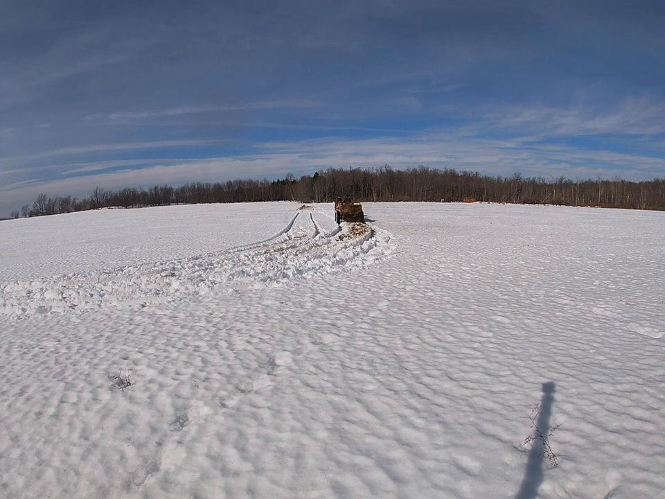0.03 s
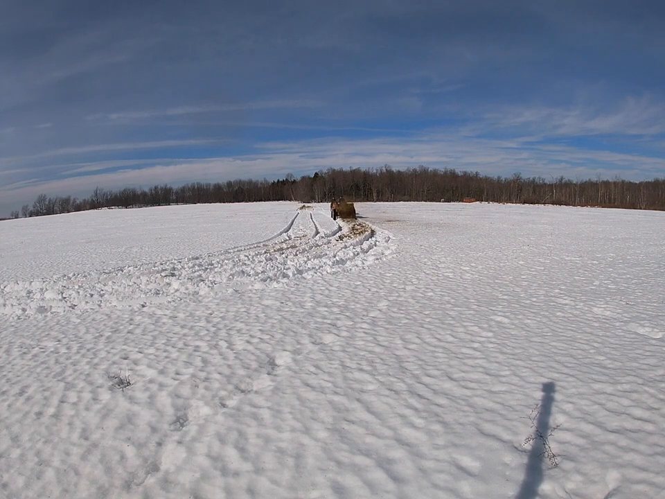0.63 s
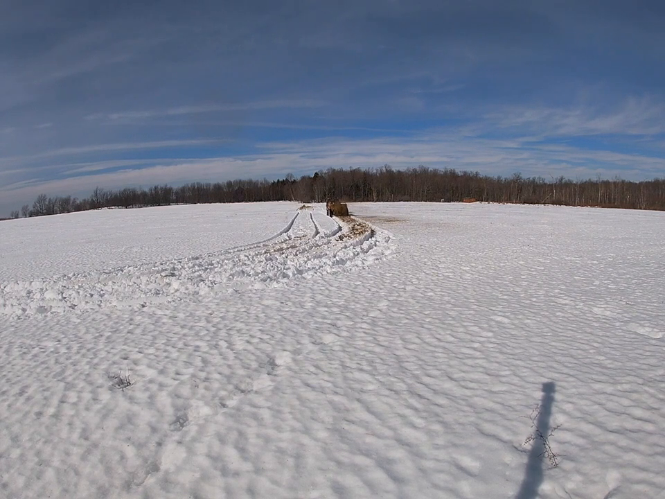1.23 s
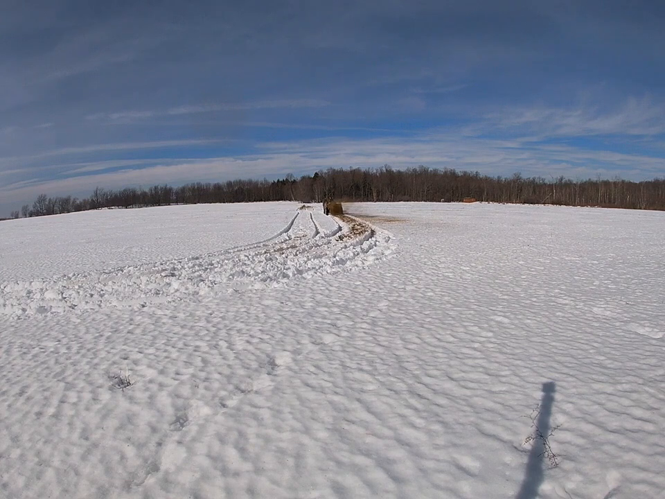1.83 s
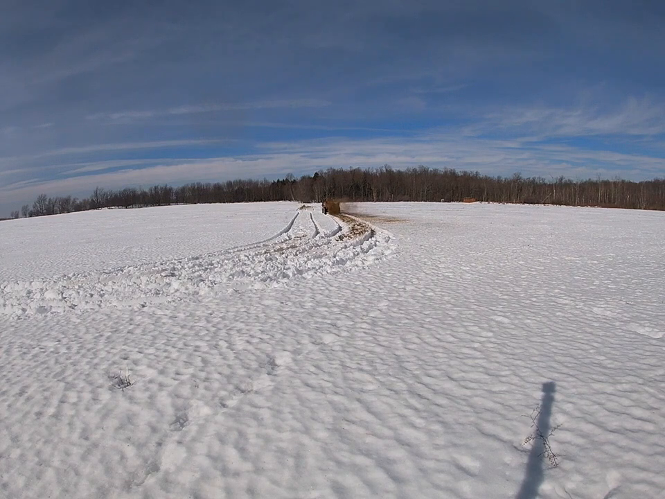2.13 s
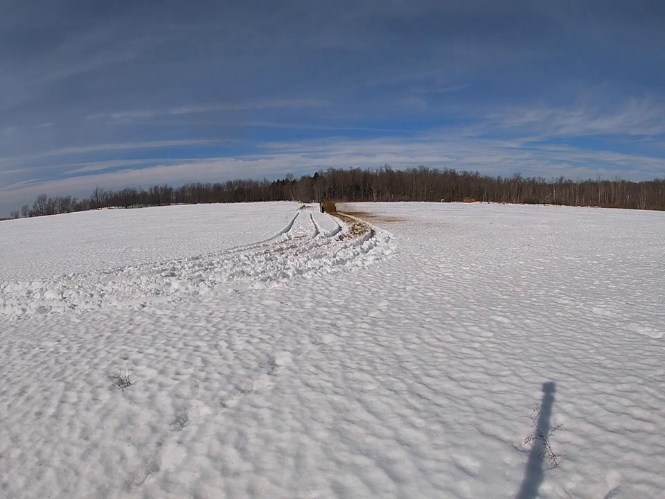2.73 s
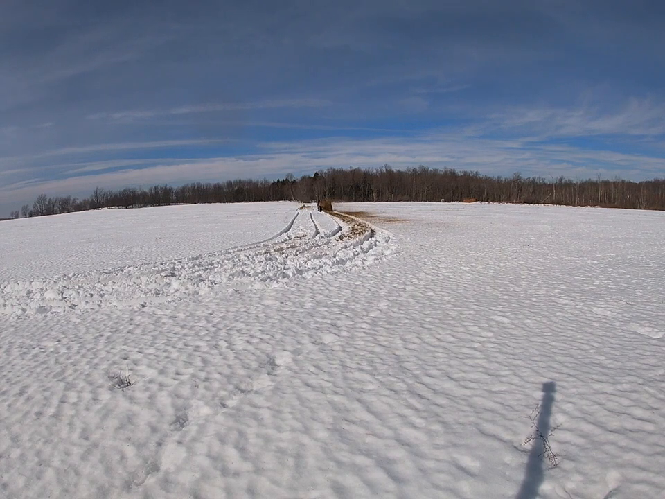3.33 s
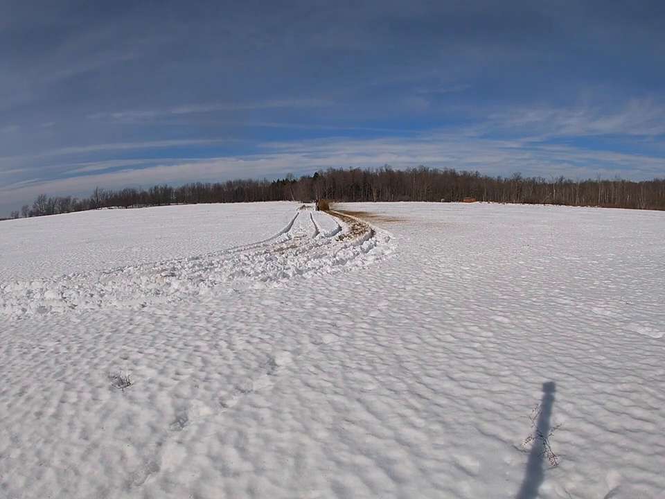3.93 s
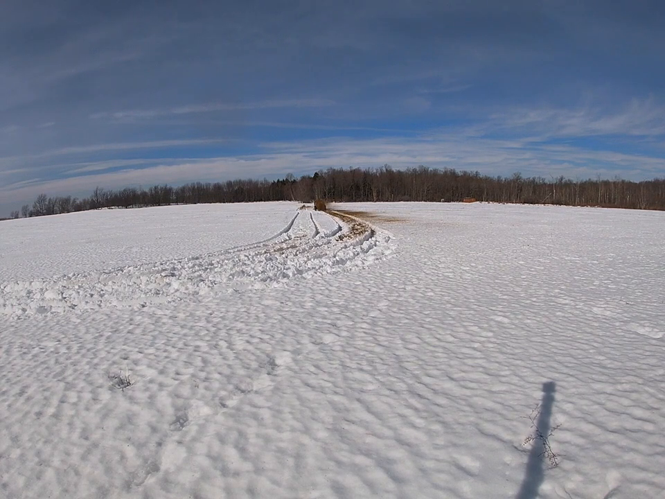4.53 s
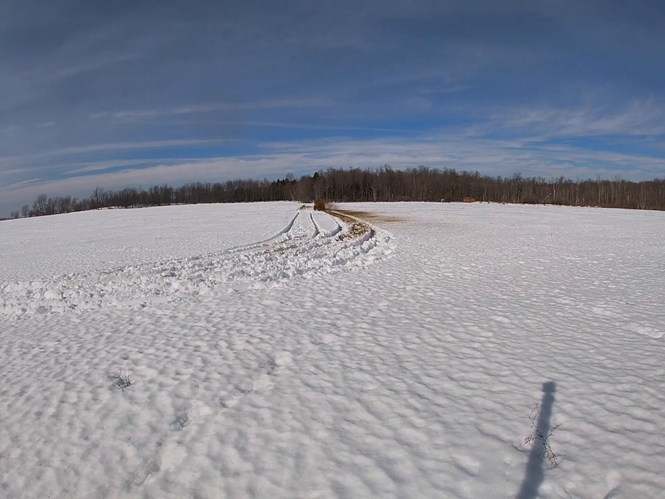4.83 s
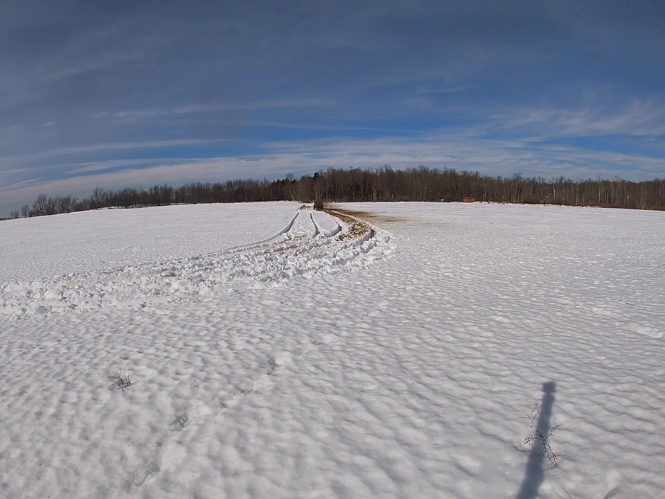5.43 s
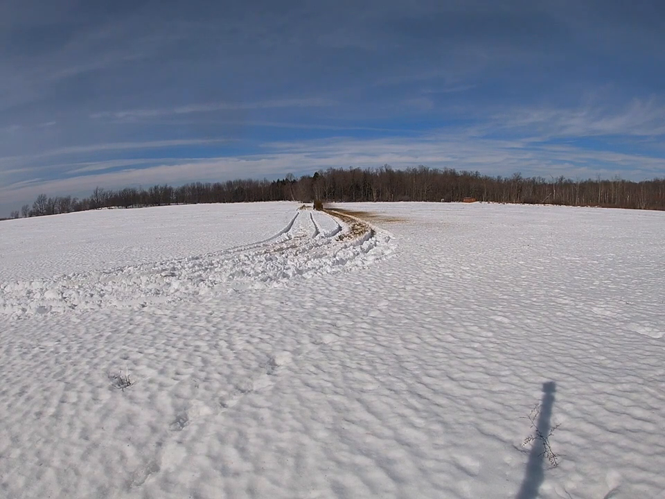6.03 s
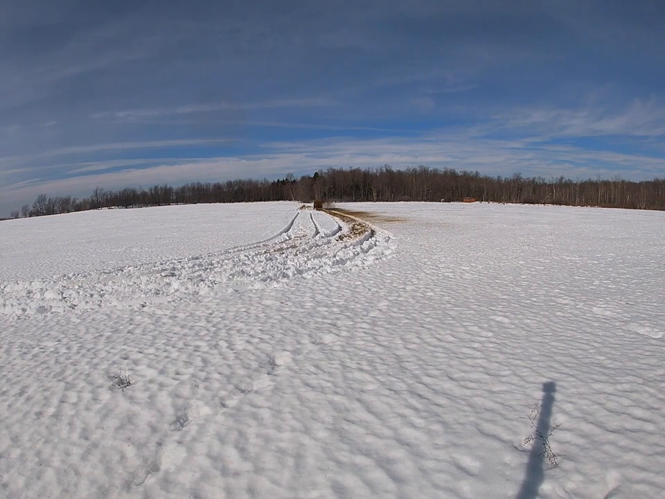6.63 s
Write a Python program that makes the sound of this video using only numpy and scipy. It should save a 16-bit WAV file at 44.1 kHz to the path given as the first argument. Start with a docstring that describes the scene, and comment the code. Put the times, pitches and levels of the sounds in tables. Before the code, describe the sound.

Wind thumps on the microphone as a farm spreader rattles, knocks and squeaks over a tractor's low rumble, gradually receding.

```python
"""A snowy field, where a tractor pulls a manure spreader away at a steady pace.
Beaters, load and apron chain collide in a dense clatter over a dull running rumble, fading with distance.
Slats knock, wads thrash through, steel links snap and jingle, the dry chain squeaks, and the box gives one
heavy clunk. A second path over the snow hollows the machine's sound; wind buffets the microphone."""
import sys
import numpy as np
from scipy import signal
from scipy.fft import rfft, irfft
from scipy.io import wavfile
from scipy.ndimage import uniform_filter1d

SR = 44100
rng = np.random.default_rng(int(sys.argv[2]) if len(sys.argv) > 2 else 0)


def transcribe(u):
    """Save the signal u as a 16-bit wav file named by the first command-line argument.

    u: samples, shape (n,) or (channels, n), limited to [-1, 1]; the rate is SR.
    q: integer samples, one column per channel.
    """
    v = np.clip(np.atleast_2d(u).T, -1, 1)
    q = np.round(v * 32767).astype(np.int16)
    wavfile.write(sys.argv[1], SR, q)


N = 295029
TIME = np.arange(N) / SR

# Tone of each machine layer, dull to bright: f/Hz, relative level/dB
RUMBLE_EQ = [(50, -39.5), (150, 6.5), (300, 1.5), (430, 0), (700, -4), (950, -5), (1400, -7), (2500, -18.5),
             (6000, -88)]
CLATTER_EQ = [(200, -40), (600, -8.5), (920, -6.5), (1070, 2.5), (1250, 0.5), (1800, 1.5), (2450, -0.5),
              (2850, -0.5), (3200, -5.5), (3900, -18), (6000, -21), (12000, -78.5)]
RATTLE_EQ = [(1500, -10), (3300, 2), (4100, 0.5), (4600, -2), (5150, 0.5), (6100, -7.5), (6850, -14.5),
             (7600, -12), (8100, -17.5), (10200, -39.5), (11500, -43.5), (15000, -46)]
JINGLE_EQ = [(4500, -54), (6400, -6), (6780, -1), (7100, -2.5), (7600, -12), (8100, -19), (10100, -27),
             (11500, -36), (15000, -65)]
SIZZLE_EQ = [(7000, -51), (9200, -8), (10300, 1.5), (11500, -16), (15000, -40)]
# Fader rides: t/s, relative level/dB
RUMBLE_RIDE = [(0, -4), (.35, -2.5), (.52, -17), (.9, 2), (1.22, -4), (1.6, 1), (2.2, 0), (2.76, 5),
               (2.95, -2.5), (3.1, 3.5), (3.26, 0.5), (3.5, 1.5), (3.6, 5.5), (3.84, 7.5), (4.0, -12),
               (4.26, -2), (4.45, -5), (5.3, -6), (6.0, -9.5), (6.69, 0)]  # swells and sinks as the tractor drives on
EFFORT_RIDE = [(0, 0), (.3, 0), (.8, 1), (1.1, 0.5), (1.18, -2.5), (1.28, 0), (1.46, 0), (1.56, 2.5),
               (1.6, -2.5), (1.88, 3), (1.95, -0.5), (2.1, 1), (2.2, -3.5), (2.33, 1.5), (2.45, 0),
               (3.1, -0.5), (3.22, 0), (3.28, -2), (3.42, -2.5), (3.7, -2.5), (3.9, -1), (4.3, -2),
               (4.78, 2.5), (5.4, 1), (5.85, 1.5), (5.91, -2.5), (5.98, 0), (6.04, -2), (6.15, -1.5),
               (6.25, -2.5), (6.69, 0)]  # how hard beaters and chain shake
JINGLE_RIDE = [(0, -54), (.08, -53.5), (.12, -58.5), (.48, -54), (.6, -63), (1.0, -57.5), (1.2, -64),
               (1.255, -55), (1.34, -62.5), (1.52, -59), (1.6, -67), (1.68, -60.5), (2.08, -65.5),
               (2.16, -70), (2.27, -83), (2.34, -63.5), (2.8, -71), (2.99, -64), (3.28, -65), (3.36, -73),
               (3.44, -65.5), (3.62, -66.5), (3.72, -65), (3.93, -67), (4.16, -68), (4.24, -84),
               (4.35, -67.5), (4.9, -73), (5.03, -77), (5.07, -61.5), (5.14, -74), (5.205, -60.5),
               (5.28, -75), (5.41, -65), (5.57, -87), (5.62, -62), (5.69, -81), (5.82, -61), (5.92, -72),
               (6.17, -69.5), (6.69, -76)]  # steel links ringing in bunches

def running_gear(rumble_db=-44, clatter_db=-43, rattle_db=-50, jingle_db=-1, sizzle_db=-77):
    """Tractor rumble and dense collisions of beaters, load and chain shake together as they recede."""
    near, effort = nearness(), curve(EFFORT_RIDE)
    shake = amp(1.33 * drift(21))
    rumble = steadied(colour(impacts(per_s=1300, spread_db=2.5, t60=0.02), RUMBLE_EQ), 0.067)
    clatter = steadied(colour(impacts(per_s=690, spread_db=3.5, t60=0.11), CLATTER_EQ), 0.024)
    rattle = steadied(colour(impacts(per_s=1100, spread_db=3, t60=0.049), RATTLE_EQ), 0.1)
    jingle = steadied(colour(impacts(per_s=260, spread_db=5.5, t60=0.078), JINGLE_EQ), 0.11)
    sizzle = colour(impacts(per_s=500, spread_db=2, t60=0.04), SIZZLE_EQ)
    rumble *= amp(rumble_db) * near * curve(RUMBLE_RIDE)
    clatter *= amp(clatter_db) * near * effort
    rattle *= amp(rattle_db) * near ** 1.29 * effort  # treble fades faster than 1 / distance
    jingle *= amp(jingle_db) * curve(JINGLE_RIDE)
    sizzle *= amp(sizzle_db - 5.5 * TIME)  # the air swallows the top end as the machine leaves
    return shake * chain_catch() * (rumble + clatter + rattle + sizzle) + jingle


# Slat and beater hits: t/s, relative level/dB, treble lift/dB
KNOCK_CUES = [(0.0263, -27.5, 5.5), (0.071, -36, 6), (.139, -33, 6), (.297, -37, 4), (.353, -33.5, 9),
              (0.4036, -33, 2), (0.4592, -31.5, 9), (0.495, -35, 9), (0.5562, -31, 5), (0.613, -36.5, 8),
              (0.6462, -31.5, 5.5), (.721, -31.5, 1), (0.758, -30.5, 6), (.798, -33, 3), (.849, -28, 4),
              (.858, -29.5, 1), (0.925, -32.5, 2), (0.9449, -30, 0), (1.04, -32, -1), (1.144, -30, 3),
              (1.189, -31.5, -2), (1.252, -27.5, 4.5), (1.3491, -27.5, 0), (1.495, -31.5, 3),
              (1.639, -29.5, -3), (1.67, -29.5, -0.5), (1.7775, -34, -3), (1.887, -35.5, -2),
              (1.971, -37, 1), (2.108, -31.5, 3), (2.224, -36.5, -4), (2.2735, -32.5, -11), (2.356, -37, 1),
              (2.427, -34.5, -3), (2.563, -31.5, -5), (2.639, -33.5, -5), (3.023, -33.5, 0.5),
              (3.102, -35.5, 2), (3.132, -35.5, 3), (3.245, -34, -1), (3.2956, -40, 1), (3.573, -36, 4),
              (3.66, -39, -1), (3.794, -39, -6), (3.871, -40, -11), (3.9603, -36, -1), (4.035, -45, 6),
              (4.093, -35, -12), (4.641, -43, 6), (4.7455, -34, -3), (4.802, -39.5, -1), (4.906, -38, 1),
              (5.111, -35, -4), (5.156, -38, 4), (5.2, -35.5, 2), (5.326, -39, 6), (5.4306, -34.5, -2),
              (5.504, -39, 5), (5.5513, -32.5, 2), (5.598, -37, -16), (5.6223, -50, 7), (5.67, -39.5, -2),
              (5.777, -38.5, 4), (5.935, -39, 3), (6.121, -34.5, 2.5), (6.239, -43, 10), (6.393, -45, 1),
              (6.458, -35, 1.5), (6.5645, -35.5, -4)]
# Tone of the struck steel frame: f/Hz, relative level/dB
KNOCK_EQ = [(200, -41), (450, 2.5), (850, -3), (1100, 3.5), (1800, 4.5), (2850, 4.5), (3600, -6.5),
            (5200, -11), (6200, -15.5), (6900, -15.5), (8200, -29), (10300, -46.5), (12000, -58.5),
            (15000, -65)]

def knocks(level_db=-2, grain_db=1.5, crack_db=5, crack_s=0.0018, hold_s=0.0051, t60=0.053, size=6000):
    """Each knock is a sharp crack, then a brief chatter of contacts that dies away in the steel frame."""
    out, t = np.zeros(N), np.arange(size) / SR
    envelope = amp(-60 * np.maximum(t - hold_s, 0) / t60)
    envelope *= amp(crack_db * np.exp(-t / crack_s))
    for s, db, treble_db in KNOCK_CUES:
        contacts = rng.standard_normal(size)
        contacts *= amp(grain_db * unit(uniform_filter1d(rng.standard_normal(size), 60)))
        eq = [(hz, level + treble_db * (hz > 3300)) for hz, level in KNOCK_EQ]
        knock = colour(contacts * envelope, eq, size=1024)
        attack_height = 2 * np.sqrt(np.mean(knock[:size // 24] ** 2))
        add(out, s, amp(db + level_db) * knock / attack_height)
    return out


def chain_catch(duck_db=1.5, lead_s=0.022, release_s=0.003):
    """Gain that ducks the clatter as the chain catches and recovers as it lets go with a knock."""
    caught = sum(np.interp(TIME, [s - lead_s, s, s + release_s], [0, 1, 0]) for s, _, _ in KNOCK_CUES)
    return amp(-duck_db * np.sin(np.pi / 2 * np.minimum(caught, 1)))


def small_knocks(level_db=-53, per_s=20, t60=0.046, spread_db=10, size=4000):
    """Lighter blows of clods and links fall at random among the big ones."""
    blows = np.zeros(N)
    for slot, (late, strength) in enumerate(rng.random((int(per_s * N / SR), 2))):
        add(blows, (slot + late) / per_s, amp(spread_db * strength) * burst(t60, size))
    return amp(level_db) * nearness() * curve(EFFORT_RIDE) * unit(colour(blows, KNOCK_EQ, size=1024))


# Wads of the load hitting the beaters: t/s, length/s, level/dB
WAD_CUES = [(0.378, 0.067, -39.5), (2.088, 0.11, -44), (2.277, 0.062, -43.5), (2.325, 0.18, -43.5),
            (2.784, 0.064, -42), (2.874, 0.05, -43.5), (3.013, 0.044, -45), (3.1, 0.038, -42),
            (3.523, 0.095, -48), (3.655, 0.057, -46), (3.781, 0.053, -43), (3.864, 0.03, -48),
            (4.091, 0.072, -49.5), (6.23, 0.041, -54), (6.668, 0.083, -44)]
# Their thick midrange: f/Hz, relative level/dB
WAD_EQ = [(150, -6.5), (380, 3), (850, 1), (1200, 3.5), (2000, -0.5), (2900, -1), (3700, -23), (6000, -30),
          (12000, -68)]

def wads(lumpy_db=3):
    """Each wad thrashes through the beaters: a fast attack, an uneven churn and a short tail."""
    envelope = np.zeros(N)
    for s, length, db in WAD_CUES:
        progress = np.linspace(0, 1, int(length * SR))
        add(envelope, s, amp(db) * np.interp(progress, [0, .1, .7, 1], [0, 1, .9, 0]))
    churn = rng.standard_normal(N) * amp(lumpy_db * drift(90))
    return envelope * unit(colour(churn, WAD_EQ))


# Steel snapping against steel: t/s, peak level/dB
CLICK_CUES = [(.142, -22.5), (.356, -38), (.461, -28), (0.559, -26), (1.255, -42), (1.637, -34),
              (1.673, -37), (2.993, -36), (3.793, -40), (4.097, -42), (4.6418, -32), (5.556, -39),
              (5.602, -37), (5.6235, -33), (5.64, -33), (6.123, -52)]
# Its hard, bright tone: f/Hz, relative level/dB
CLICK_EQ = [(400, -40), (1200, 4), (2850, 17.5), (3700, 2), (5200, 0.5), (6100, -21), (6900, 5.5),
            (8200, -26), (10300, -19.5), (14000, -57)]

def steel_clicks(t60=0.007, size=3000):
    """Hard steel contacts give bright snaps only a few milliseconds long."""
    out = np.zeros(N)
    for s, db in CLICK_CUES:
        snap = colour(burst(t60, size), CLICK_EQ, size=1024)
        add(out, s, amp(db) * snap / abs(snap).max())
    return out


# The dry chain on its sprocket: t/s, length/s, f/Hz, relative level/dB
SQUEAK_CUES = [(0.1, 0.021, 2810, -34), (0.383, 0.025, 2710, -38), (0.605, 0.02, 2800, -36.5),
               (0.639, 0.023, 2874, -31.5), (0.844, 0.019, 3000, -33.5), (1.105, 0.04, 2810, -38),
               (2.986, 0.033, 2780, -43), (5.06, 0.053, 2815, -42.5), (5.156, 0.039, 2835, -39.5),
               (5.207, 0.028, 2830, -40.5), (5.503, 0.069, 2830, -46), (5.769, 0.026, 2730, -43),
               (6.175, 0.036, 2800, -47.5)]

def chain_squeaks(level_db=-10, rough_db=4, rise=0.015, waver=0.016):
    """A link sticks and slips as it turns: a rough, wavering squeak that rises as the chain tightens."""
    out, bend, grip = np.zeros(N), drift(220), drift(290)
    for s, length, hz, db in SQUEAK_CUES:
        span = slice(int(s * SR), int((s + length) * SR))
        glide = rise * np.linspace(-.5, .5, len(bend[span]))
        cycles = np.cumsum(hz * (1 + glide + waver * bend[span])) / SR
        squeak = np.sin(2 * np.pi * cycles) * amp(rough_db * grip[span])
        squeak *= signal.windows.tukey(len(squeak), .5)
        add(out, s, amp(db + level_db) * unit(squeak))
    return out


# Something heavy hits the box and bounces: t/s, relative level/dB
CLUNK_CUES = [(4.6803, -33), (4.684, -33.5)]
# Resonances of the box: f/Hz, relative level/dB, t60/s
BOX_MODES = [(503, -9.5, 0.066), (930, -4, 0.036), (1080, -5, 0.036), (1350, -0.5, 0.016),
             (1650, -3, 0.024), (1820, 1.5, 0.031), (2050, -4, 0.013), (2400, -8, 0.02), (2800, -8, 0.025)]

def box_clunk(crack_db=1, crack_t60=0.011, lowpass_hz=3300):
    """A heavy blow draws a crack and a hollow ring from the spreader box."""
    out = np.zeros(N)
    for s, db in CLUNK_CUES:
        add(out, s, amp(db) * ring(BOX_MODES))
        add(out, s, amp(db + crack_db) * burst(crack_t60, size=4000))
    return signal.sosfilt(signal.butter(4, lowpass_hz, fs=SR, output="sos"), out)


# The path that skims the snow: t/s, gain/ratio to the direct sound, delay/s
SNOW_PATH = [(0, 0.034, 0.00023), (2.5, 0.018, 0.00091), (4.1, 0.16, 0.00042), (5.6, 0.21, 0.00043),
             (6.0, 0.12, 0.000585), (6.69, 0.24, 0.00055)]

def over_snow(direct):
    """The sound arrives twice, a moment apart, which carves a shifting comb into its spectrum."""
    times, *columns = np.transpose(SNOW_PATH)
    gain, delay = (np.interp(TIME, times, column) for column in columns)
    reflection = gain * np.interp(TIME - delay, TIME, direct)
    return (direct + reflection) / np.sqrt(1 + gain ** 2)


# The wind bed dies down, then picks up: t/s, level/dB
BREEZE_RIDE = [(0, -28.5), (.25, -33.5), (.32, -28), (.44, -30.5), (.55, -31), (.615, -35.5), (.74, -29.5),
               (.83, -37), (.92, -32), (1.1, -32), (1.38, -32), (1.48, -31), (1.6, -31.5), (1.7, -32),
               (1.82, -30), (2.01, -34.5), (2.13, -30), (2.22, -37.5), (2.35, -31.5), (2.55, -34),
               (2.85, -31.5), (3.1, -35), (3.36, -36.5), (3.46, -39), (3.62, -39.5), (3.69, -36),
               (3.75, -41.5), (3.86, -33.5), (3.97, -34.5), (4.06, -39), (4.26, -36), (4.35, -37.5),
               (4.55, -41.5), (4.7, -41.5), (4.85, -44), (4.98, -47.5), (5.04, -39.5), (5.09, -47),
               (5.15, -39), (5.22, -44), (5.3, -50.5), (5.48, -41), (5.73, -42), (5.81, -63), (5.86, -43),
               (5.97, -45), (6.08, -33), (6.19, -28.5), (6.28, -31.5), (6.35, -39.5), (6.48, -34),
               (6.62, -41.5), (6.69, -23.5)]
# Gusts on top of it: crest t/s, length/s, level/dB
GUST_CUES = [(.37, 0.1, -25.5), (1.47, 0.12, -28.5), (1.92, 0.054, -26.5), (2.09, 0.11, -28),
             (2.765, 0.057, -24.5), (4.27, 0.079, -32), (5.22, 0.077, -37), (5.71, .08, -45)]
# Deep push of large eddies and flutter of small ones: f/Hz, relative level/dB
PUSH_EQ = [(8, -4.5), (22, -3), (45, 0), (70, -2.5), (100, -5), (130, -23), (300, -44), (900, -97.5),
           (4000, -120)]
FLUTTER_EQ = [(40, -21), (90, -5), (120, -0.5), (150, -1), (195, -7), (250, -15.5), (350, -22.5),
              (600, -29.5), (2000, -79.5), (8000, -110)]

def wind(flutter_db=-7.5, lumpy_db=4, unrest_db=1, gust_flutter_db=-4, pivot_db=-28.5, growth=1.25):
    """Large eddies push on the microphone; small ones flutter in lumps, more so in strong wind."""
    breeze = curve(BREEZE_RIDE) * amp(unrest_db * drift(21))
    gusts = sum(amp(db) * np.cos(np.pi * np.clip((TIME - s) / length, -.5, .5))
                for s, length, db in GUST_CUES)
    large_eddies = np.hypot(breeze, gusts)
    stirring = np.hypot(breeze, amp(gust_flutter_db) * gusts)
    small_eddies = amp(pivot_db) * (stirring / amp(pivot_db)) ** growth
    push = steadied(colour(rng.standard_normal(N), PUSH_EQ, size=16384), 0.051)
    lumps = rng.standard_normal(N) * amp(lumpy_db * drift(23))
    flutter = steadied(colour(lumps, FLUTTER_EQ, size=8192), 0.047)
    return large_eddies * push + amp(flutter_db) * small_eddies * flutter


# Single puffs of air: middle t/s, level/dB, f/Hz, length/s
PUFF_CUES = [(1.73, -37.5, 164, .06), (1.785, -35, 177, 0.05), (1.84, -33, 140, .05),
             (2.126, -36, 135, 0.08), (2.49, -41, 148, .06), (2.79, -32, 151, 0.052),
             (3.02, -38.5, 135, .06), (3.11, -36.5, 141, .06), (3.24, -35.5, 133, 0.0415),
             (3.839, -34.5, 112, .07), (3.96, -38.5, 153, .06), (4.265, -42.5, 162, .08),
             (5.159, -45, 175, .06), (5.687, -42.5, 155, 0.0445), (6.163, -43, 306, 0.018),
             (6.241, -35.5, 267, 0.0197), (6.275, -49, 169, .04), (6.442, -42, 195, 0.04),
             (6.57, -44, 183, 0.032)]

def wind_puffs():
    """Each puff flutters at the microphone as a short, soft-edged band of low noise."""
    out = np.zeros(N)
    for s, db, hz, length in PUFF_CUES:
        band = signal.butter(3, [hz * .45, hz * 1.2], "bandpass", fs=SR, output="sos")
        swirl = signal.sosfilt(band, rng.standard_normal(SR // 4))[-int(length * SR):]
        add(out, s - length / 2, amp(db) * unit(swirl * np.hanning(len(swirl))))
    return out


# Sharp gusts striking the microphone: t/s, peak level/dB, half length/s
THUMP_CUES = [(.009, -22.5, 0.0041), (0.143, -23, 0.0025), (0.206, -26.5, 0.0026), (0.347, -24, 0.0028),
              (0.391, -26, 0.0019), (0.52, -25, 0.0026), (0.565, -23, 0.0023), (0.688, -21, 0.004),
              (0.899, -26, 0.0017), (1.16, -19.5, 0.0036), (1.298, -21.5, 0.003), (1.5, -23, 0.0028),
              (1.681, -22, 0.0033), (1.725, -20, 0.0017), (1.901, -21.5, 0.002), (2.075, -19.5, 0.0028),
              (2.123, -22, 0.0025), (2.277, -24.5, 0.0026), (2.419, -21, 0.0023), (2.708, -19, 0.0025),
              (2.884, -21.5, 0.0044), (2.988, -24, 0.0033), (3.297, -21.5, 0.004), (3.384, -28, 0.0032),
              (3.93, -20.5, 0.0022), (3.969, -21.5, 0.003), (4.187, -25, 0.0027), (4.451, -24.5, 0.0026),
              (4.558, -27, 0.0031), (6.061, -23.5, 0.0027), (6.13, -21, 0.0029), (6.162, -15.5, 0.0013),
              (6.236, -20, 0.0027), (6.554, -22.5, 0.0033)]

def wind_thumps():
    """A passing eddy thumps once: pressure, then suction."""
    out = np.zeros(N)
    for s, db, half_length in THUMP_CUES:
        passage = (TIME - s) / half_length
        out -= amp(db) * passage * np.exp((1 - passage ** 2) / 2)
    return out


def nearness(doubling_s=3.96):
    """Starting distance over present distance, for a machine leaving at steady speed."""
    return 1 / (1 + TIME / doubling_s)


def impacts(per_s, spread_db, t60):
    """A random hail of small collisions, each a burst of noise that dies quickly."""
    strengths = amp(spread_db * np.minimum(rng.exponential(1, N), 3))
    hits = strengths * (rng.random(N) < per_s / SR)
    power = signal.lfilter([1], [1, -amp(-120 / (t60 * SR))], hits ** 2)
    return unit(np.sqrt(power) * rng.standard_normal(N))


def burst(t60, size):
    """Noise that falls 60 dB in t60 seconds."""
    return amp(-60 * np.arange(size) / (t60 * SR)) * rng.standard_normal(size)


def ring(modes, size=12000):
    """Damped modes after one blow, each struck a little harder or softer."""
    t = np.arange(size) / SR
    return sum(amp(db + rng.normal(0, 1) - 60 * t / t60) * np.sin(2 * np.pi * (hz * t + rng.random()))
               for hz, db, t60 in modes)


def colour(x, eq, size=4096):
    """Minimum-phase EQ, so that attacks stay sharp."""
    hz, db = np.transpose(eq)
    bin_hz = abs(np.fft.fftfreq(size, 1 / SR))
    gain = amp(np.interp(np.log(bin_hz + 1), np.log(hz), db))
    taps = np.fft.ifft(np.exp(np.conj(signal.hilbert(np.log(gain))))).real
    return signal.oaconvolve(x, taps[:size // 2])[:len(x)]


def drift(rate_hz):
    """Random motion of rms 1, mostly slower than the given rate."""
    hz = np.fft.rfftfreq(N, 1 / SR)
    return unit(irfft(rfft(rng.standard_normal(N)) / (1 + (hz / rate_hz) ** 2), N))


def steadied(x, seconds):
    """Evens out swells slower than the given time."""
    size = max(int(seconds * SR), 2)
    power = uniform_filter1d(uniform_filter1d(x ** 2, size), size)
    return x / np.sqrt(abs(power) + 1e-12)


def curve(ride):
    """Gain over time from rows of t/s, level/dB."""
    return amp(np.interp(TIME, *np.transpose(ride)))


def amp(db):
    """Decibels to gain."""
    return 10 ** (np.asarray(db) / 20)


def unit(x):
    """Scales to rms 1."""
    return x / np.sqrt(np.mean(x ** 2) + 1e-20)


def add(mix, s, sound):
    """Mixes a sound in at time s."""
    part = mix[max(round(s * SR), 0):][:len(sound)]
    part += sound[:len(part)]


def scene():
    """The machine is heard across open snow; the wind is right at the microphone."""
    machine = running_gear() + wads() + knocks() + steel_clicks() + small_knocks()
    machine += chain_squeaks() + box_clunk()
    return (over_snow(machine) + wind() + wind_puffs() + wind_thumps())[None]


def record(dry, cutoff_hz=15000):
    """A steep low-pass trims the top of the mix."""
    lowpass = signal.firwin(511, cutoff_hz, window=("kaiser", 9), fs=SR)
    return signal.oaconvolve(dry, lowpass[None], "same")


dry = scene()
out = record(dry)
transcribe(out)
```